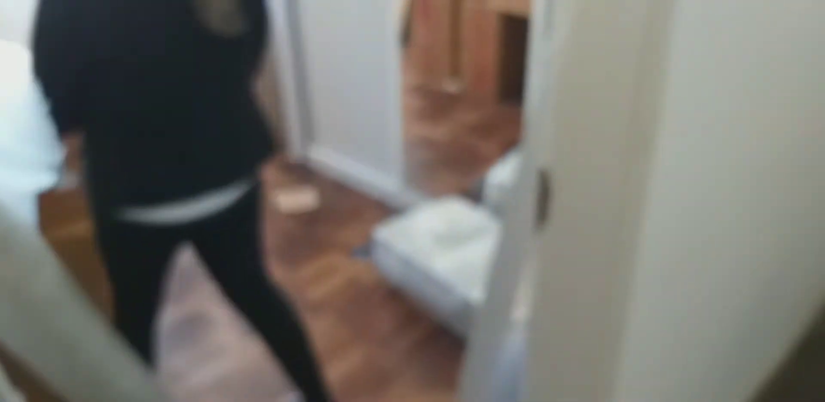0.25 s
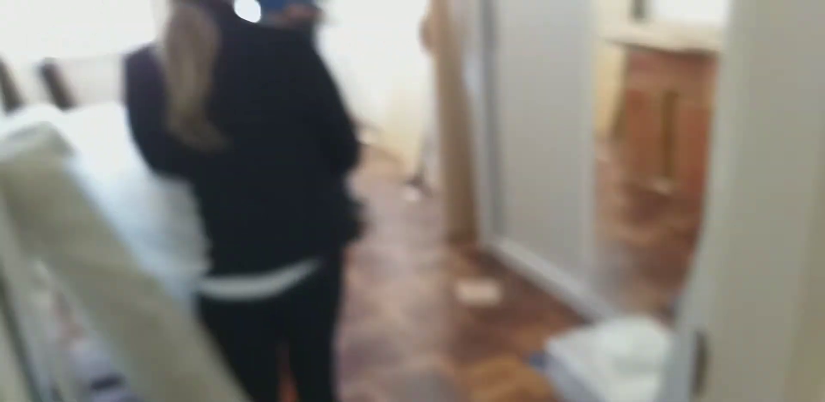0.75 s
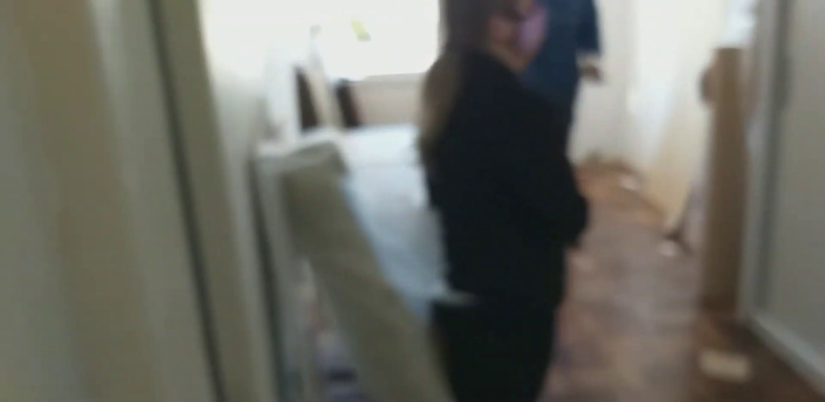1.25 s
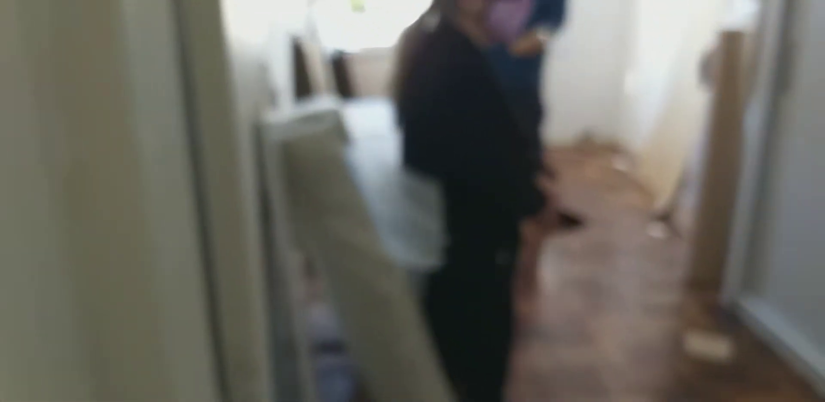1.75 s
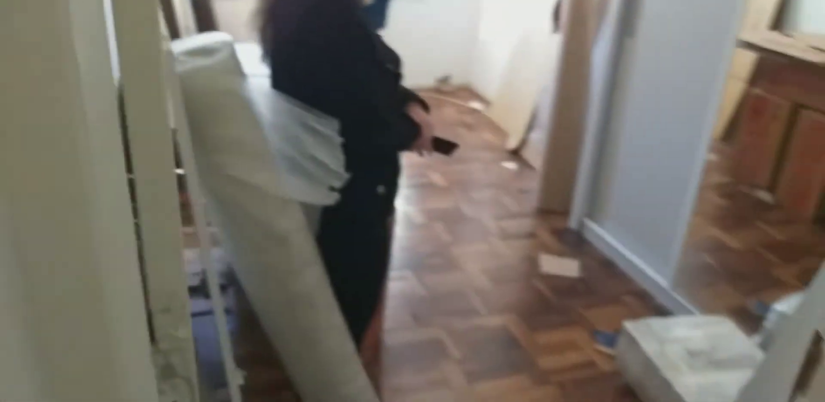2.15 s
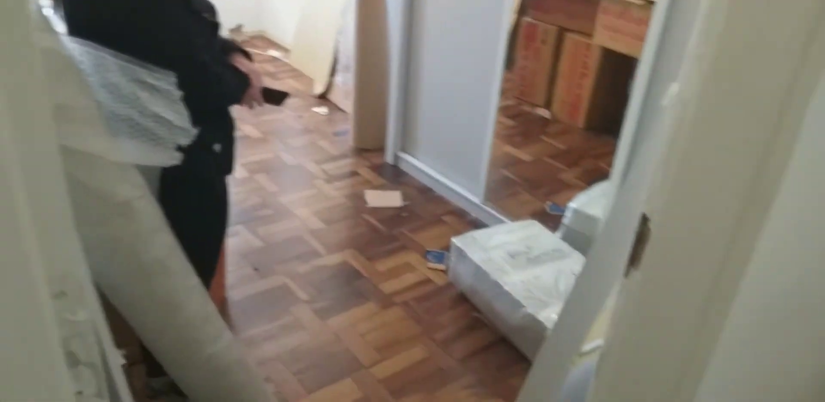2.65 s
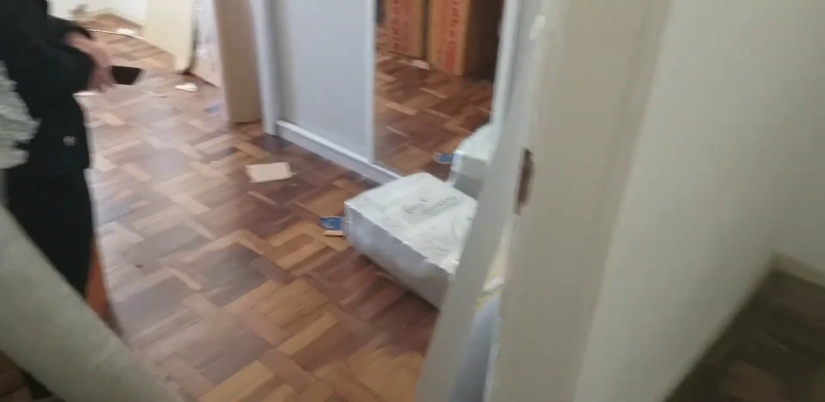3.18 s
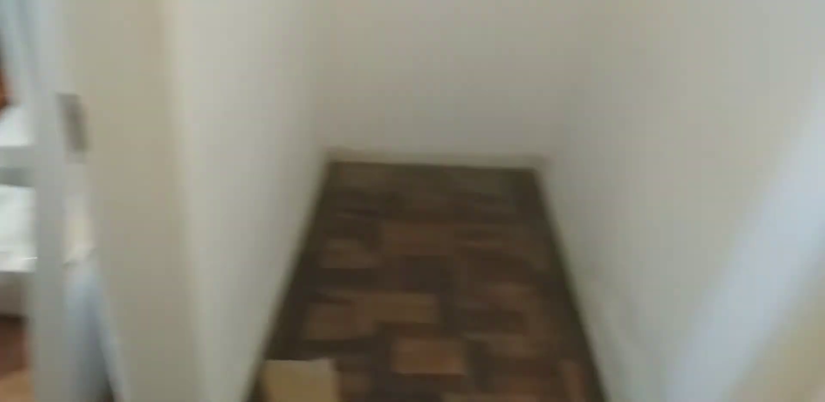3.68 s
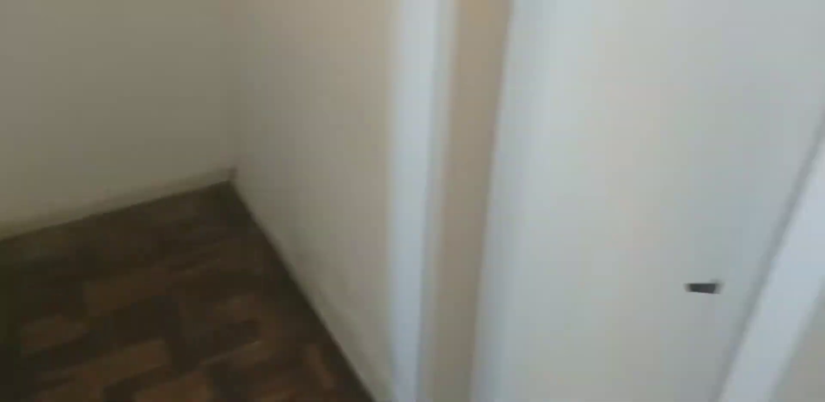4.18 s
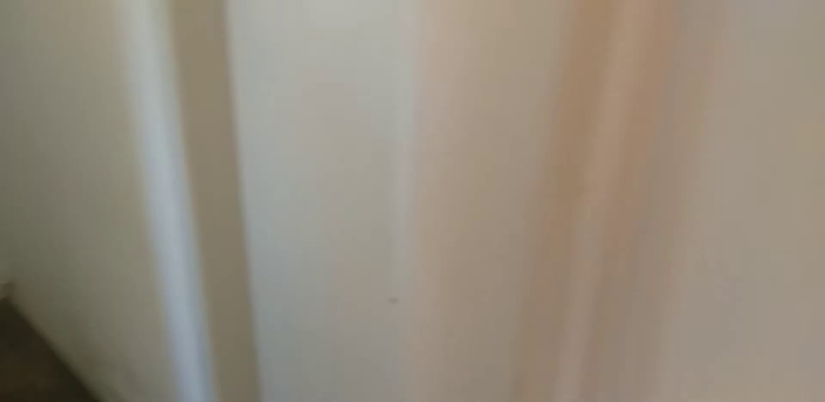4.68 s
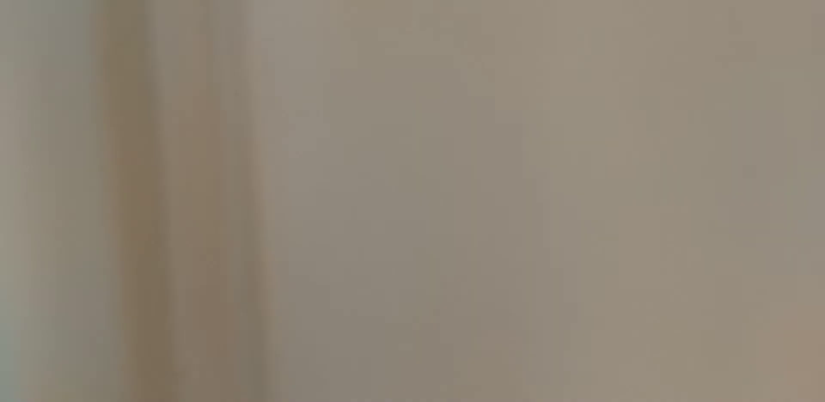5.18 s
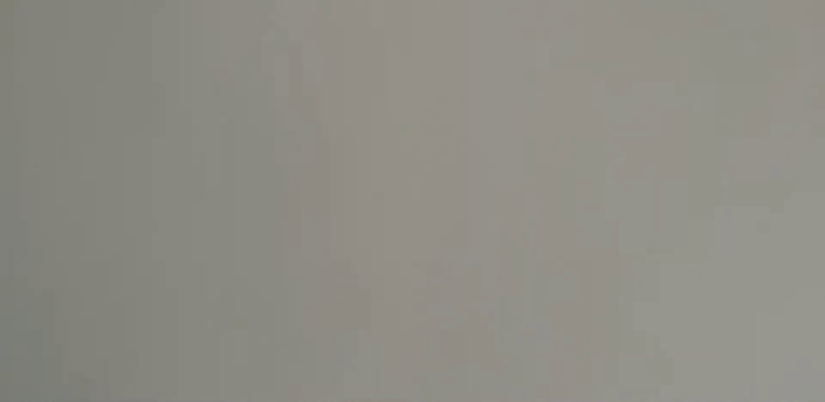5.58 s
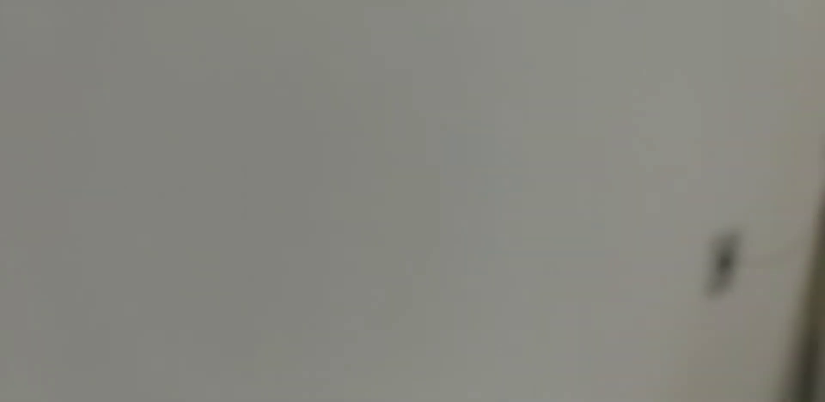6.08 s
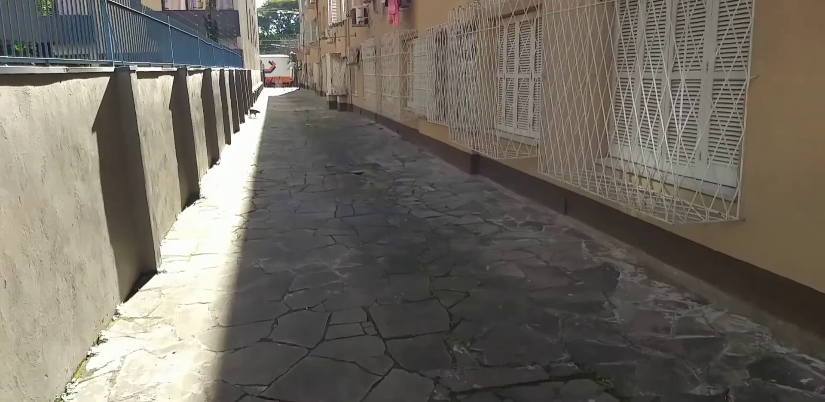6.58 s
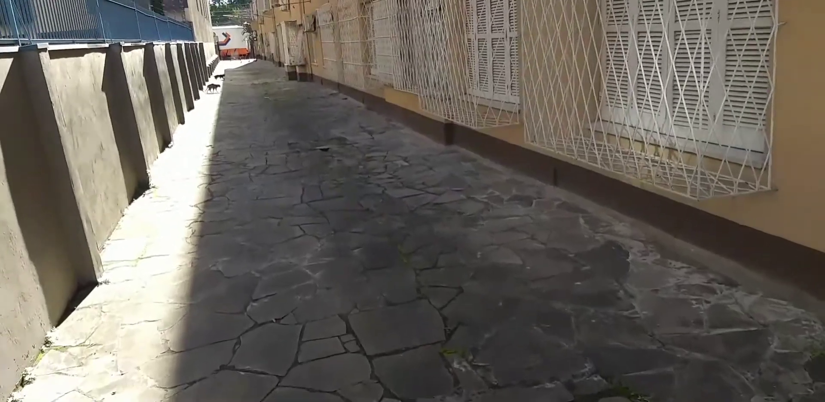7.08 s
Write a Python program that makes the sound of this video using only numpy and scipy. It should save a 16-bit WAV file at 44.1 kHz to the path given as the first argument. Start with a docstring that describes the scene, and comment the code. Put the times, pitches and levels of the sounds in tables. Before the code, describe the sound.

A phone carried through a bare room picks up close rustling of clothes and plastic, hissy and crinkly, over a very faint low building hum. Shoes scuff gritty parquet from about 0.3 s, with the strongest, bright scrape at 0.74 s ringing off the walls and another scuff at 1.1 s. Rustling swells between 1 and 2 s, with a sharp swish at 1.9 s. A sole drags at 2.3 s; heavier steps at 2.75 to 3.0 s crack grit and boom in the floor. Softer rubs and slides follow, with scuffs near 4.9 and 5.2 s. Hard, dry finger knocks click on the phone at 5.73 and 5.85 s, alongside a swish, then a last scuff at 6.25 s. After a brief gap at 6.45 s, an alley opens: soft distant traffic, wavering machine tones, a thin high whine, faint gritty steps at 6.55 s and a clearer one on stone at 7.1 s.

```python
"""Footsteps on gritty parquet, then an alley

Shoes scuff, slide and tread in an emptied flat, heard from a phone carried through it: friction is
shaped noise that echoes and rings brightly in the bare room; heel landings boom in the floor.
Clothes and plastic wrapping rustle in three noise bands; fingers knock on the phone's case.
After a short silence follows an outdoor alley: traffic noise, unsteady tones and steps on sandy stone.
"""
import sys
import numpy as np
from scipy import signal
from scipy.fft import rfft, irfft, next_fast_len
from scipy.io import wavfile
from scipy.ndimage import uniform_filter1d, map_coordinates

SR = 44100
rng = np.random.default_rng(int(sys.argv[2]) if len(sys.argv) > 2 else 0)


def master_out(mix):
    """Clip the mix to full scale and print it as 16-bit PCM to the path in sys.argv[1]."""
    frames = np.transpose(np.atleast_2d(mix))
    ceiling = np.clip(frames, -1, 1)
    pcm = np.round(ceiling * 32767).astype(np.int16)
    wavfile.write(sys.argv[1], SR, pcm)


N = 323694
TIME = np.arange(N) / SR

# Levels are relative wherever a source below adds its own gain; spectra are scaled to rms 1 in use.
# machine hum: (time [s], low hum level [dB], upper hum level [dB])
HUM_LEVELS = [(0, -90, -90), (2, -70.5, -66), (3.1, -80, -73), (3.6, -64.5, -70), (4.6, -58, -56),
              (5.15, -58, -69.5), (6.35, -57.5, -74)]
# rumble of the building: (frequency [Hz], density [dB per Hz])
BUILDING_SPECTRUM = [(20, -5), (40, -29), (55, -1.5), (85, 4.5), (115, -1), (160, -0.5), (250, -9),
                     (500, -13), (1500, -14.5), (5000, -29), (16000, -38)]
# distant traffic: (frequency [Hz], density [dB per Hz])
TRAFFIC_SPECTRUM = [(30, -26), (55, -3), (90, 1.5), (140, -0.5), (280, -3), (560, -8.5), (800, -3.5),
                    (1050, -5.5), (1850, -3.5), (2700, -14), (4500, -10.5), (6400, -19), (9000, -20),
                    (13000, -43)]
# machines outdoors: (frequency [Hz], level [dB], frequency wander [Hz])
OUTDOOR_MACHINES = [(115, -64.5, 4.4), (794, -66, 15)]
# soles on sandy stone: (time [s], rise [s], fade [s], stone level [dB], sand level [dB])
PAVING_STEPS = [(6.531, 0.065, 0.084, -65, -59.5), (6.62, 0.033, 0.024, -57, -59),
                (7.08, 0.033, 0.082, -48, -50.5)]
# sand grinding: (frequency [Hz], density [dB per Hz])
SAND_SPECTRUM = [(2000, -31), (4400, 3), (6500, -3.5), (8500, 0), (10500, -4), (12500, -2), (15500, -4)]
# sole on stone: (frequency [Hz], density [dB per Hz])
STONE_SPECTRUM = [(60, -20), (200, -13), (380, -2), (600, -8.5), (900, -15), (2000, -14), (6000, -38),
                  (15000, -44)]
# clothes and wrapping, one row per movement:
# (time [s], rise [s], hold [s], hiss level [dB], crinkle above hiss [dB], flap above hiss [dB])
CLOTH_MOVEMENTS = [(0, 0.0033, 0.14, -51, -2, -6), (0.334, 0.1, 0.016, -46.5, 0, -8),
                   (0.57, 0.02, 0.033, -48, -4, -5.5), (1.042, 0.062, 0.16, -44, -4.5, -14.5),
                   (1.26, .025, 0.022, -48, 0, -8), (1.407, 0.07, 0.034, -44, -1.5, -20),
                   (1.512, 0.026, 0.18, -52, -0.5, -6), (1.726, 0.078, 0.085, -43.5, -3.5, -18),
                   (1.889, .03, 0.12, -39.5, -6.5, -18.5), (2.02, 0.065, 0.042, -45, -4, -9.5),
                   (2.15, 0.035, 0.035, -49, -3, -6), (2.263, 0.028, 0.11, -49.5, -5.5, -6),
                   (2.9, 0.025, 0.2, -55, 0, -5.5), (3.265, 0.052, 0.12, -55.5, -2, -12.5),
                   (3.445, .11, .13, -48.5, -4, -11), (3.713, 0.04, 0.061, -45.5, -3, -12.5),
                   (4.047, 0.12, 0.19, -49.5, -5.5, -22), (4.58, 0.054, .03, -54, -4, -29),
                   (4.704, 0.068, .05, -46, -4.5, -17), (4.868, 0.052, 0.097, -52.5, 1.5, -7.5),
                   (5.119, 0.076, 0.044, -50, -2.5, -15), (5.346, 0.069, .12, -50.5, -4, -15.5),
                   (5.531, 0.045, 0.13, -49.5, -3.5, -15.5), (5.866, .07, 0.078, -49, -2.5, -4),
                   (6.075, 0.043, .06, -57, -1.5, -8), (6.27, 0.041, 0.038, -63.5, 6, 4.5)]
# fabric sliding: (frequency [Hz], density [dB per Hz])
HISS_SPECTRUM = [(3000, -40), (6000, -12.5), (7000, -5), (8300, -0.5), (10300, -6.5), (12200, -4),
                 (14000, -12), (16000, -14)]
# folds crinkling: (frequency [Hz], density [dB per Hz])
CRINKLE_SPECTRUM = [(1500, -28), (2900, -12.5), (3700, -2), (4500, 0.5), (5500, 0), (6500, -6.5),
                    (9000, -32)]
# folds flapping: (frequency [Hz], density [dB per Hz])
FLAP_SPECTRUM = [(200, -15), (600, -9), (1100, -4), (1800, 3), (2500, 0), (3500, 4.5), (7000, -22)]
# quick rubs of cloth or sole: (time [s], rise [s], fade [s], level [dB], band centre [Hz])
RUBS = [(0.267, 0.006, 0.018, -38.5, 4330), (1.451, 0.02, 0.02, -56, 4470),
        (1.637, 0.0035, 0.012, -40.5, 8840), (1.72, 0.0067, 0.005, -42.5, 8900),
        (1.91, 0.0091, 0.012, -33.5, 10700), (3.291, .005, 0.024, -51, 8500),
        (3.465, 0.0047, .015, -46.5, 8500), (4.498, 0.023, 0.0043, -51, 5570),
        (4.885, 0.035, 0.023, -49.5, 1070), (5.219, .004, 0.047, -48.5, 2970),
        (5.8, 0.022, 0.06, -37, 7500), (6.246, 0.0076, 0.037, -44, 4530)]
# fingers on the phone: (time [s], peak level [dB], pitch [Hz], life [s], case rattle level [dB])
FINGER_TAPS = [(5.7314, -21, 1370, 0.00058, -41), (5.7495, -30.5, 1270, 0.00094, -50.5),
               (5.8519, -17.5, 12000, .0002, -75), (5.853, -11.5, 2900, 0.00011, -68)]
# rattle of the case: (frequency [Hz], density [dB per Hz])
CASE_SPECTRUM = [(100, -18), (600, -10), (1400, -10.0), (2400, -16), (8000, -30)]
# grit cracking under a sole: (time [s], peak level [dB], pitch [Hz], life [s])
GRAIN_SNAPS = [(0.59, -23, 7170, 0.0019), (0.7456, -17, 8500, 0.0011), (1.1012, -21, 8750, 0.0035),
               (2.353, -32, 8100, .003), (2.8063, -18.5, 6600, 0.0019), (5.2231, -26, 4470, 0.0042),
               (6.154, -36, 10000, .002), (6.166, -39, 9900, .003), (6.538, -40.5, 14000, 0.0063),
               (7.107, -47, 8000, 0.0025), (7.145, -39, 9050, .003)]
# heels landing with the body's weight: (time [s], level [dB], contact time [s])
HEEL_LANDINGS = [(2.803, -46, 0.0011), (2.828, -38.5, 0.0011), (2.987, -44, 0.0037), (3.019, -36, 0.015)]
# floor and room modes: (frequency [Hz], level [dB], decay t60 [s])
FLOOR_MODES = [(87, -6, 0.59), (141, -5.5, 0.84), (201.6, -8, 0.78), (240.4, 0.5, 0.22), (331.4, 4.5, 0.22)]
# soles on parquet: (time [s], rise [s], fade [s], grit level [dB], grit tilt [dB per octave],
# wood level [dB], thud level [dB])
PARQUET_STEPS = [(.27, 0.0073, 0.023, -46.5, -0.5, -68, -78), (0.369, .003, 0.0092, -48.5, 1, -78, -85),
                 (.4, 0.054, 0.049, -67, 14, -63.5, -85), (.578, 0.016, 0.017, -43, -6, -57.5, -87),
                 (.705, 0.043, .006, -41.5, 0, -74, -83), (.738, 0.011, 0.033, -20.5, -1.5, -44, -82),
                 (.81, .04, 0.015, -58, 0, -48.5, -62), (1.084, 0.022, 0.018, -36, 0, -52, -84),
                 (2.334, .016, 0.062, -41.5, 1.5, -55, -64), (2.73, 0.0028, 0.073, -42, 3.5, -80, -60),
                 (2.755, 0.02, 0.021, -40, -2, -54, -51), (2.799, 0.0041, 0.041, -36.5, 0, -48, -46.5),
                 (2.982, 0.0034, 0.053, -42.5, -3.5, -57, -48.5), (3.32, 0.069, .05, -63, 0, -73, -60.5),
                 (3.49, 0.022, .12, -54, 3, -64.5, -66), (4.19, 0.17, 0.031, -60.5, -8.5, -61.5, -73.5),
                 (4.868, 0.055, 0.013, -42.5, -0.5, -64, -72),
                 (5.222, 0.02, 0.036, -47.5, -10.5, -57.5, -79), (5.355, 0.0098, 0.1, -62, -14, -58, -59.5),
                 (5.814, 0.02, 0.023, -41, -8, -59, -83), (6.244, 0.008, 0.054, -48, -3.5, -64, -64.5)]
# sole on grit: (frequency [Hz], density [dB per Hz])
GRIT_SPECTRUM = [(300, -78), (900, -22.5), (1800, -11), (2800, -10), (4300, 1), (5200, 1.5), (6500, -3.5),
                 (8400, 4.5), (10300, -1), (12200, 2.5), (14000, -4), (16000, -10)]
# sole on wooden blocks: (frequency [Hz], density [dB per Hz])
WOOD_SPECTRUM = [(100, -42), (220, -19), (330, -5), (450, 0), (750, 9), (1150, 7.5), (1800, -4),
                 (3000, -30), (8000, -41)]
# loaded floor: (frequency [Hz], density [dB per Hz])
THUD_SPECTRUM = [(30, -38), (60, -32), (90, -1.5), (160, 6), (310, 6), (400, 1), (800, -6), (3000, -56)]
# bright ringing tail of the scuffs in the bare room: (frequency [Hz], level [dB], decay t60 [s])
ROOM_RING = [(1786, -1.5, 1), (3100, -3, 0.55), (3730, -27, 0.74), (4260, -13, 0.62), (4550, 11, 0.4),
             (4500, -7, 0.54), (5060, 14, 0.17), (7590, -3, 0.28), (7950, 16, .35), (8600, 14, .35),
             (8830, -7, 0.76), (11900, 2, .35), (12300, -10, 0.18)]
# reverberation of bare walls: (frequency [Hz], decay t60 [s])
WALL_DECAY = [(100, 0.47), (400, 0.46), (1000, 0.38), (4000, 0.47), (8000, 0.35), (15000, 0.32)]
# stereo width: (frequency [Hz], level [dB])
STEREO_WIDTH = [(100, -58), (1170, -47), (1850, -4.5), (2800, -45.5), (7300, -61), (9700, -7), (12000, -59),
                (15000, -43)]

LEAVE_S, OUTDOORS_S = 6.44, 6.477  # the flat ends; the alley begins
TOP_HZ = 15850  # upper band limit
HUM_WAVER_HZ = 3.5  # frequency wander of the upper hum
TRAFFIC_DB, SAND_DB = -50.5, -67.5  # steady far traffic; sand shifting between steps
THIN_HZ, THIN_DB, THIN_FLUTTER = 5565, -65.5, 0.55  # thin whine: pitch, level, flutter depth (ratio)
RUSTLE_FADE_S = 0.081  # time constant with which a movement dies away
# resting cloth: hiss, then crinkle and flap relative to it
STIR_DB, STIR_CRINKLE_DB, STIR_FLAP_DB = -57.5, -5, -22.5
PATCHY_DB = 2.2  # rms level change of the shifting contact
WEIGHT_LAG_S, WEIGHT_RISE_S = 0.0092, 0.0061  # delay after first touch; extra rise time
PRESSED_DB, PRESSED_TILT_DB = -8, -8.5  # grit under weight: relative level, extra tilt per octave


def amp(db):
    """Level: decibels converted to an amplitude ratio."""
    return 10 ** (np.asarray(db) / 20)


def unit(x):
    """Normalisation: the signal is scaled to rms 1."""
    return x / np.sqrt(np.mean(x ** 2) + 1e-20)


def along(points, hz):
    """Logarithmic interpolation: (frequency, value) points read on a log frequency axis."""
    f, v = np.transpose(points)
    return np.interp(np.log(hz + 1), np.log(f + 1), v)


def curves(rows):
    """Linear interpolation: one value per sample for each column after the time."""
    s, *columns = np.transpose(rows)
    return [np.interp(TIME, s, column) for column in columns]


def add(track, s, sound):
    """Superposition: a sound is summed into the track at time s."""
    start = max(round(s * SR), 0)
    track[start:start + len(sound)] += sound[:N - start]


def wobble(rate):
    """Slow random modulation: a smooth curve through `rate` random knots a second."""
    knots = rng.standard_normal(int(N * rate / SR) + 4)
    return map_coordinates(knots, [TIME * rate])


def friction(spectrum, size=N, spiky_db=0, tilt_db=0):
    """Stick-slip noise: random slips, uneven by spiky_db, coloured by a spectrum tilted above 2 kHz."""
    m = next_fast_len(size)
    slips = rng.standard_normal(m) * amp(spiky_db * rng.standard_normal(m))
    hz = np.fft.rfftfreq(m, 1 / SR)
    gain = amp(along(spectrum, hz) + tilt_db * np.log2(np.maximum(hz, 2000)))
    return unit(irfft(rfft(slips) * gain, m)[:size])


def patches(x):
    """Shifting contact: short-lived resonances come and go as a smoothed random gain field."""
    z = signal.stft(x, nperseg=512)[2]
    field = rng.standard_normal(z.shape)
    field = uniform_filter1d(field, size=3, axis=0)  # across frequency
    field = uniform_filter1d(field, size=14, axis=1)  # across time
    shifted = signal.istft(z * amp(PATCHY_DB * unit(field)), nperseg=512)[1]
    return unit(shifted[:len(x)])


def stroke(t, rise, fade):
    """Contact pressure: it builds up as about the root of time, then lets go exponentially."""
    return np.minimum(t / rise, 1) ** 0.51 * np.exp(-np.maximum(t - rise, 0) / fade)


def drone(hz, width_hz):
    """Frequency modulation: a sine of rms 1 whose pitch wanders at random."""
    frequency = hz + width_hz * wobble(width_hz * 2)
    return unit(np.sin(2 * np.pi * np.cumsum(frequency) / SR))


def ringing(modes, t):
    """Modal superposition: a sum of exponentially decaying sines."""
    return sum(amp(db - 60 * t / t60) * np.sin(2 * np.pi * hz * t) for hz, db, t60 in modes)


def room(x, direct_db, build=0.0044):
    """Reverberation: direct sound plus a dense decaying tail from bare walls, drawn anew each call."""
    hz, t, z = signal.stft(rng.standard_normal(SR * 3 // 4), SR, nperseg=256)
    decay = amp(-60 * t / along(WALL_DECAY, hz)[:, None])
    tail = signal.istft(z * decay, SR, nperseg=256)[1]
    tail = tail * (1 - np.exp(-np.arange(len(tail)) / SR / build))
    response = tail / np.linalg.norm(tail)
    response[0] = amp(direct_db)
    return signal.fftconvolve(x, response)


def room_tone():
    """Steady background: low noise of the building and two wavering tones of a humming machine."""
    low_db, upper_db = curves(HUM_LEVELS)
    low_hum = amp(low_db - 7.0) * drone(54, 0.49)
    upper_hum = amp(upper_db - 5.5) * drone(113, HUM_WAVER_HZ)
    return low_hum + upper_hum + amp(-66.0) * friction(BUILDING_SPECTRUM)


def alley():
    """Outdoor mixture: traffic noise, machine tones, a fluttering whine, and friction of sandy steps."""
    out = amp(TRAFFIC_DB) * friction(TRAFFIC_SPECTRUM)
    for hz, db, width_hz in OUTDOOR_MACHINES:
        out += amp(db) * drone(hz, width_hz)
    out += amp(THIN_DB) * (1 + THIN_FLUTTER * wobble(35)) * drone(THIN_HZ, 13)
    t = np.arange(SR // 2) / SR
    grinding = np.full(N, amp(SAND_DB))
    for s, rise, fade, stone_db, sand_db in PAVING_STEPS:
        pressure = stroke(t, rise, fade)
        stone = friction(STONE_SPECTRUM, size=len(t), spiky_db=8)
        add(out, s, amp(stone_db) * pressure * stone)
        add(grinding, s, amp(sand_db) * pressure)
    sand = amp(wobble(83)) * friction(SAND_SPECTRUM, spiky_db=6.5)
    return out + grinding * sand


def rustle():
    """Incoherent addition: movements sum in power; fabric hisses, its folds crinkle and flap lower down."""
    # rows: hiss, crinkle, flap; the cloth never quite rests
    power = (amp(STIR_DB) * amp([[0], [STIR_CRINKLE_DB], [STIR_FLAP_DB]])) ** 2
    for s, rise, hold, db, crinkle_db, flap_db in CLOTH_MOVEMENTS:
        t = TIME - s
        swell = np.clip(t / rise, 0, 1)
        slide = amp(db) * swell * np.exp(-np.maximum(t - rise - hold, 0) / RUSTLE_FADE_S)
        power = power + (slide * amp([[0], [crinkle_db], [flap_db]])) ** 2
    catching_db = 0.5 * wobble(35) + 0.27 * wobble(220)
    hiss = amp(-0.04) * friction(HISS_SPECTRUM)
    crinkle = amp(-0.5) * patches(friction(CRINKLE_SPECTRUM, spiky_db=4))
    flap = amp(2.5) * patches(friction(FLAP_SPECTRUM, spiky_db=4))
    return amp(catching_db) * np.sum(np.sqrt(power) * [hiss, crinkle, flap], axis=0)


def swishes():
    """Periodic texture: a fine, even surface rubbed at one speed hisses around one pitch."""
    out, t = np.zeros(N), np.arange(SR // 4) / SR
    for s, rise, fade, db, hz in RUBS:
        band = [(hz / 3, -32), (hz / 1.33, -14), (hz / 0.92, 0),
                (hz * 0.94, 0), (hz * 1.45, -14), (hz * 3, -32)]
        rub = amp(db) * stroke(t, rise, fade) * friction(band, size=len(t), spiky_db=5.5)
        add(out, s, amp(-4) * room(rub, direct_db=2.5))
    return out


def knocks():
    """Structure-borne impact: taps reach the microphone through the case as a dry swing and a rattle."""
    out, t = np.zeros(N), np.arange(SR // 16) / SR
    for s, db, hz, life, rattle_db in FINGER_TAPS:
        displacement = np.sin(2 * np.pi * hz * t) * t * np.exp(-2 * t / life)
        # the microphone follows the speed of the case, so the swing carries little bass
        swing = np.gradient(displacement)
        rattle = friction(CASE_SPECTRUM, size=len(t)) * np.exp(-t / 0.014)
        add(out, s, amp(db) * swing / np.abs(swing).max() + amp(rattle_db) * rattle)
    return out


def cracks():
    """Brittle fracture: single grains give way with a short bright burst of band noise."""
    out, t = np.zeros(N), np.arange(SR // 16) / SR
    for s, db, hz, life in GRAIN_SNAPS:
        band = [(hz / 4, -26), (hz, 0), (hz * 2, -18)]
        snap = friction(band, size=len(t)) * np.exp(-t / life)
        add(out, s, amp(db) * snap / np.abs(snap).max())
    return out


def heels():
    """Impulse excitation: a heel pushes the floor modes once; longer contact gives a deeper boom."""
    out, t = np.zeros(N), np.arange(SR // 2) / SR
    # the modes of the room take a moment to fill
    boom = ringing(FLOOR_MODES, t) * (1 - np.exp(-t / 0.0031))
    for s, db, contact in HEEL_LANDINGS:
        # the boards give and spring back, so no steady pressure is left
        push = (1 - 4 * t / contact) * np.exp(-4 * t / contact)
        add(out, s, amp(db) * signal.fftconvolve(push / np.abs(push).sum(), boom))
    return out


def footsteps():
    """Sliding friction under load: a sole skims the grit, then its weight grinds grit, wood and floor."""
    out, t = np.zeros(N), np.arange(SR // 2) / SR
    ring = ringing(ROOM_RING, t)
    ring = ring / np.linalg.norm(ring)
    for s, rise, fade, grit_db, tilt_db, wood_db, thud_db in PARQUET_STEPS:
        grit = amp(grit_db) * friction(GRIT_SPECTRUM, size=len(t), spiky_db=3.0, tilt_db=tilt_db)
        pressed = amp(grit_db + PRESSED_DB) * friction(
            GRIT_SPECTRUM, size=len(t), spiky_db=5.0, tilt_db=tilt_db + PRESSED_TILT_DB)
        wood = amp(wood_db) * patches(friction(WOOD_SPECTRUM, size=len(t), spiky_db=2))
        thud = amp(thud_db) * friction(THUD_SPECTRUM, size=len(t))
        touch = stroke(t, rise, fade)
        weight = stroke(np.maximum(t - WEIGHT_LAG_S, 0), rise + WEIGHT_RISE_S, fade)
        scuff = amp(0.5) * (touch * grit + weight * (pressed + wood + thud))
        add(out, s, room(scuff, direct_db=1))
        add(out, s, amp(-21) * signal.fftconvolve(scuff, ring))
    return out


def scene():
    """Superposition in time: the flat, a moment of silence, then the alley, equal in both channels."""
    indoors = room_tone() + rustle() + swishes() + knocks() + heels() + footsteps()
    # grains crack in both places
    mono = indoors * (TIME < LEAVE_S) + alley() * (TIME > OUTDOORS_S) + cracks()
    return np.array([mono, mono])


def record(dry):
    """Stereo width and band limit: opposite quadrature parts widen the sound; the top is cut off."""
    m = next_fast_len(N + SR // 2)
    hz = np.fft.rfftfreq(m, 1 / SR)
    width = 1 + 1j * np.outer([1, -1], amp(along(STEREO_WIDTH, hz)))
    return irfft(rfft(dry, m) * width * (hz < TOP_HZ), m)[:, :N]


dry = scene()
out = record(dry)
master_out(out)
```